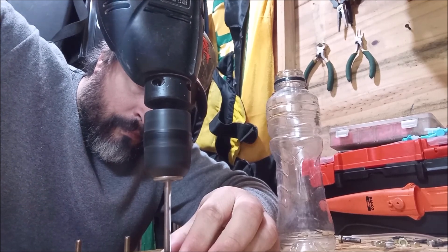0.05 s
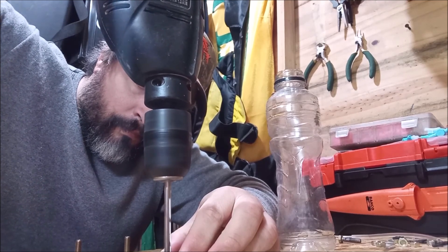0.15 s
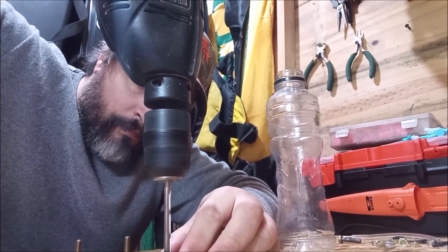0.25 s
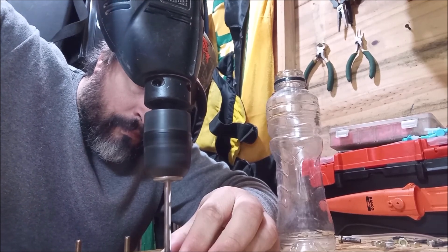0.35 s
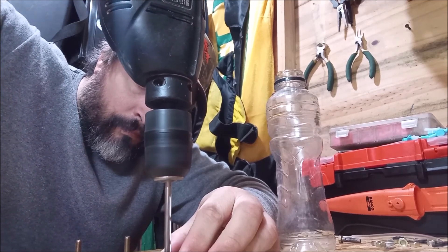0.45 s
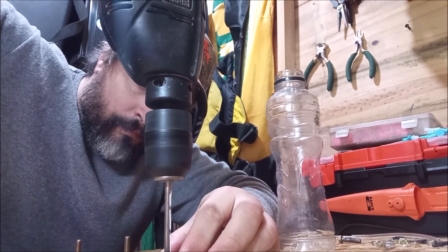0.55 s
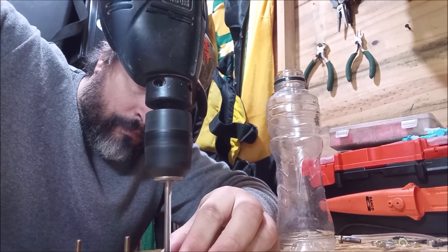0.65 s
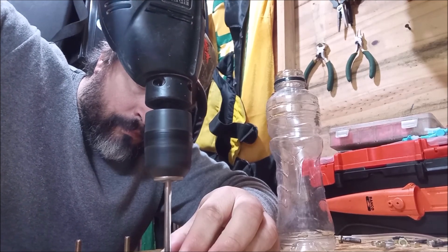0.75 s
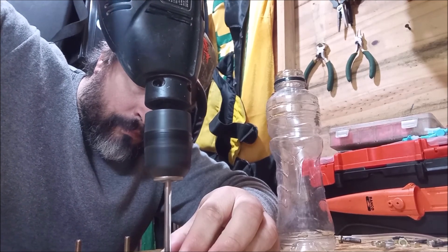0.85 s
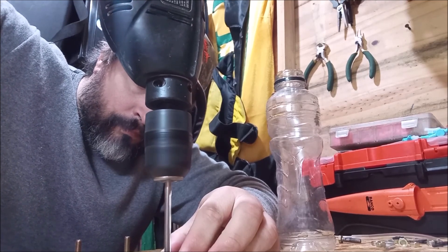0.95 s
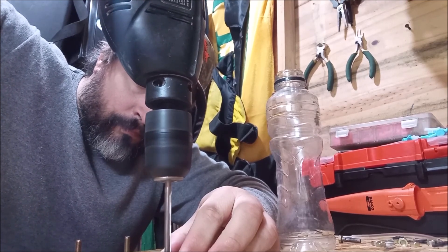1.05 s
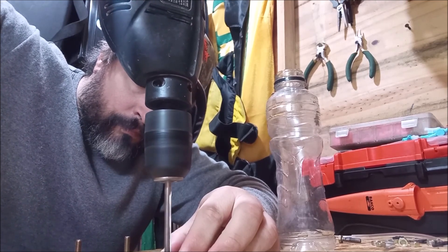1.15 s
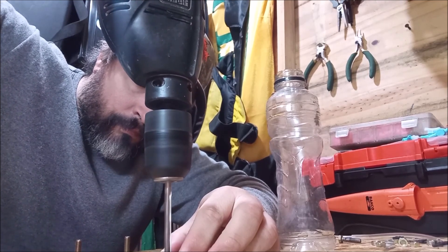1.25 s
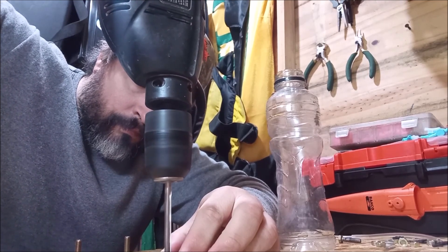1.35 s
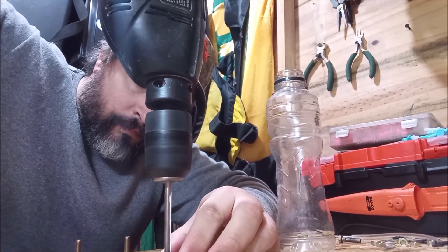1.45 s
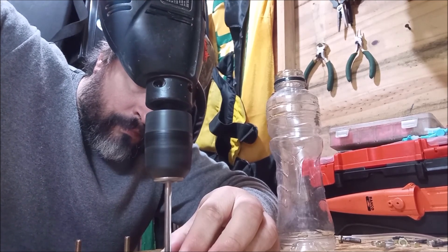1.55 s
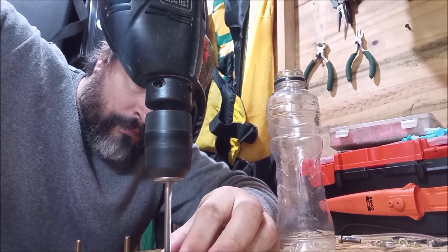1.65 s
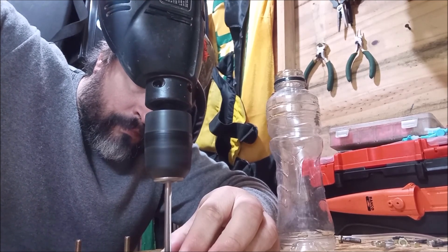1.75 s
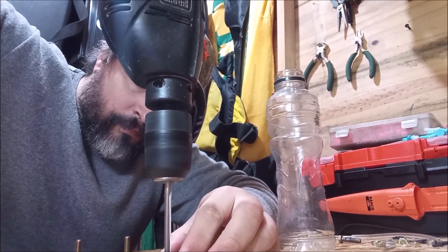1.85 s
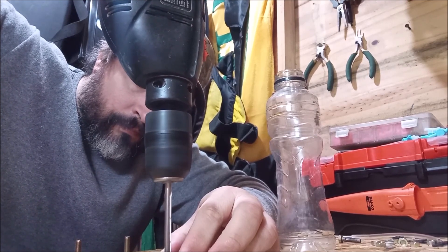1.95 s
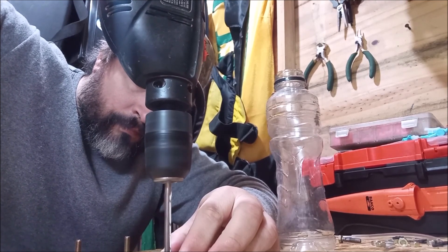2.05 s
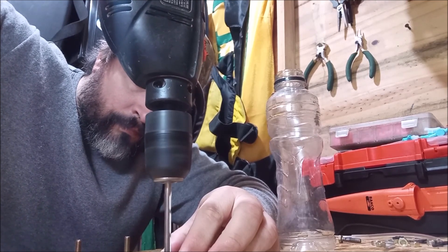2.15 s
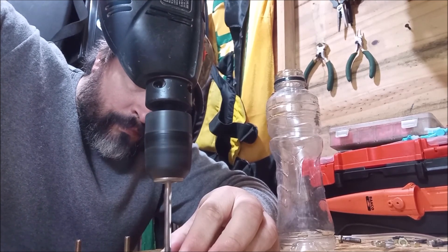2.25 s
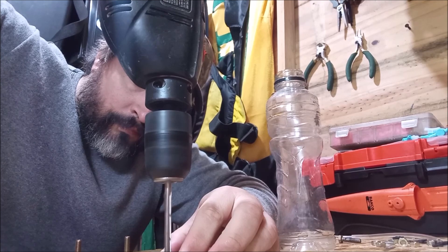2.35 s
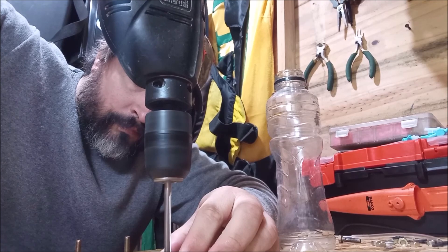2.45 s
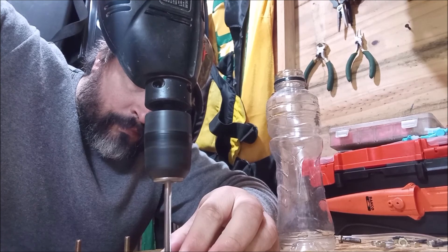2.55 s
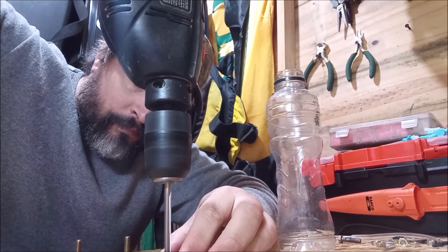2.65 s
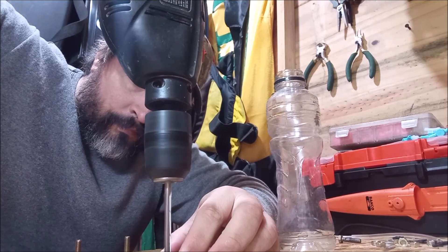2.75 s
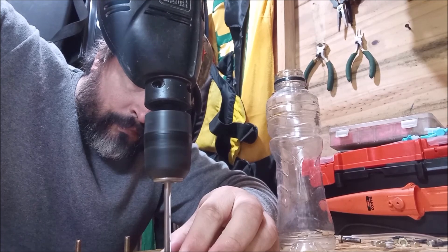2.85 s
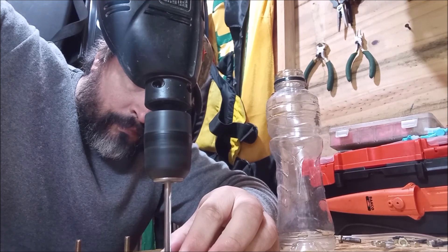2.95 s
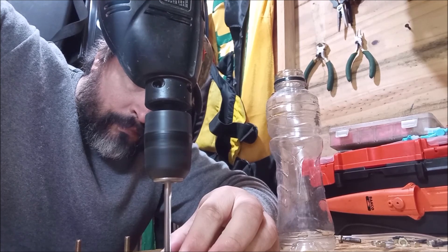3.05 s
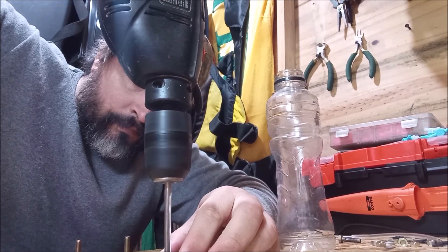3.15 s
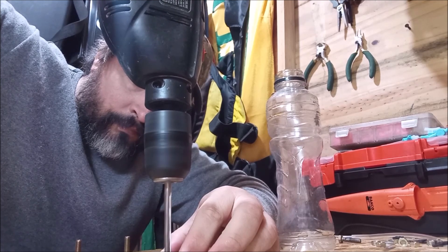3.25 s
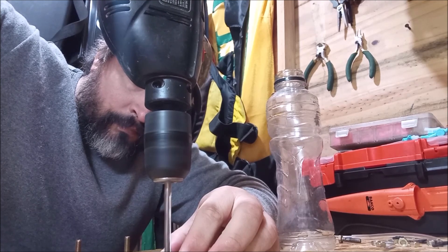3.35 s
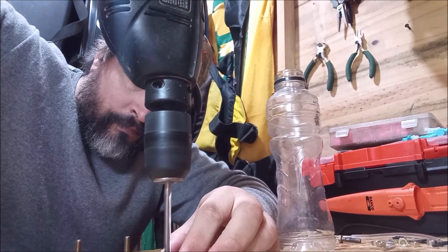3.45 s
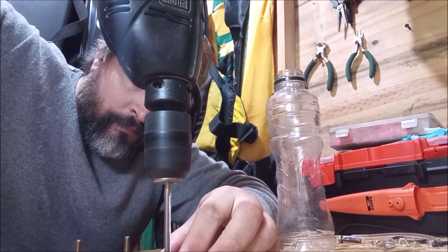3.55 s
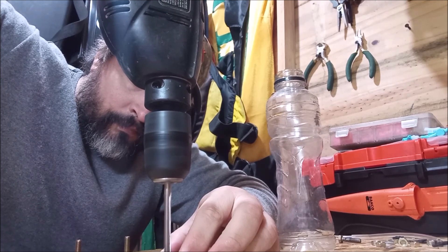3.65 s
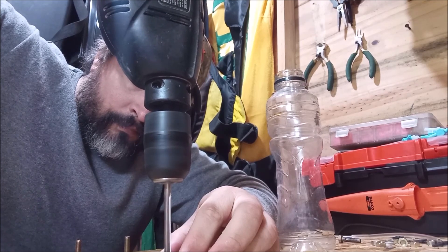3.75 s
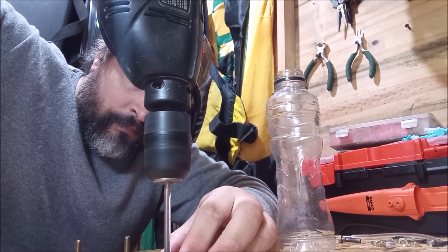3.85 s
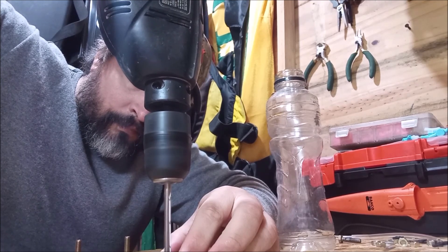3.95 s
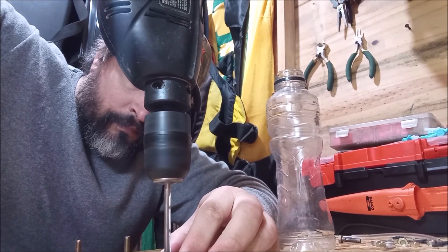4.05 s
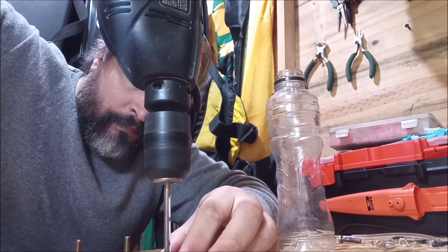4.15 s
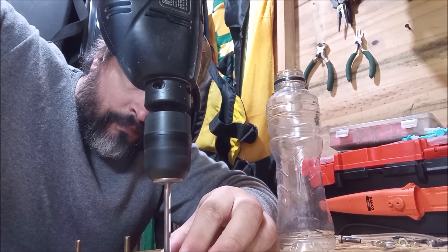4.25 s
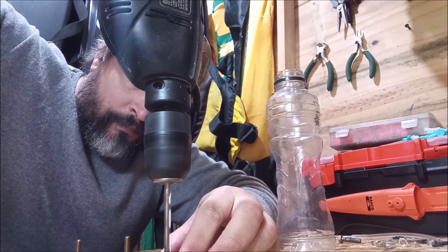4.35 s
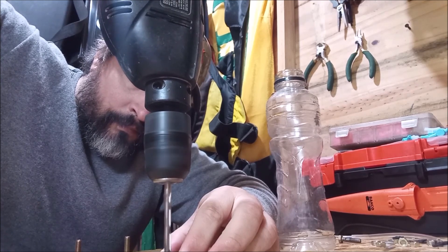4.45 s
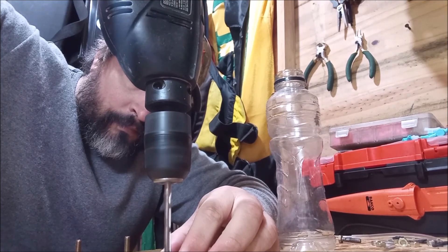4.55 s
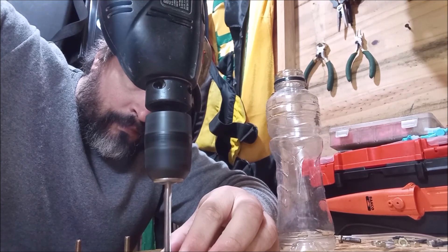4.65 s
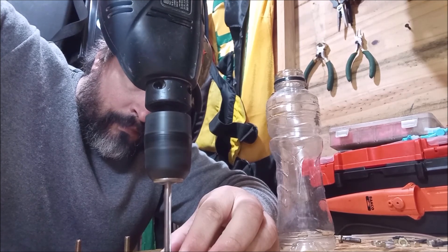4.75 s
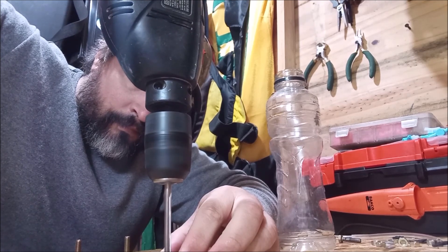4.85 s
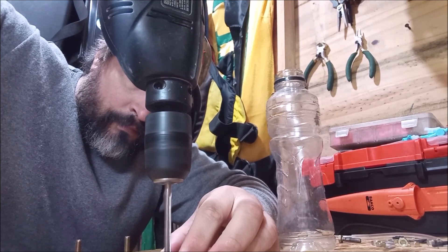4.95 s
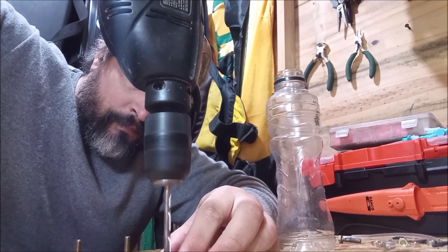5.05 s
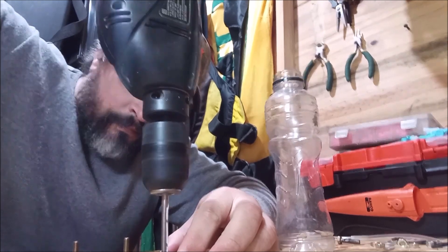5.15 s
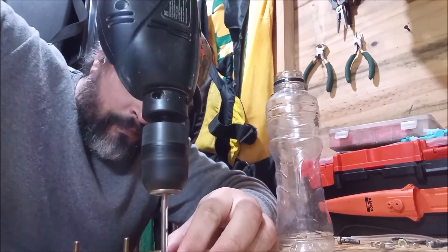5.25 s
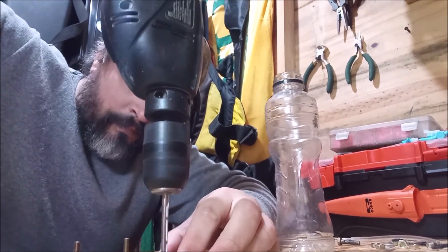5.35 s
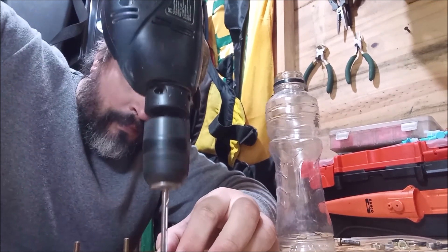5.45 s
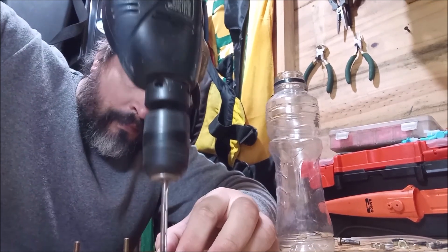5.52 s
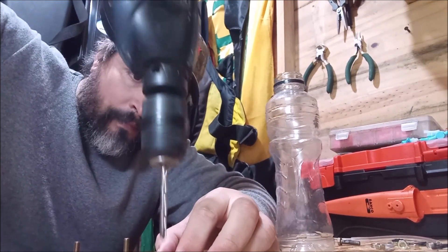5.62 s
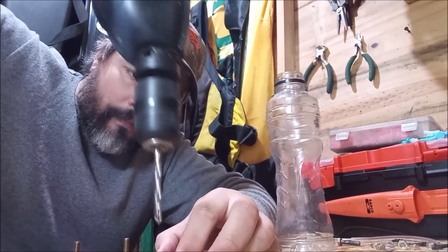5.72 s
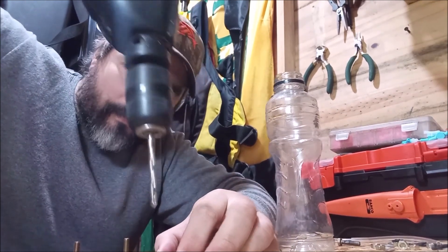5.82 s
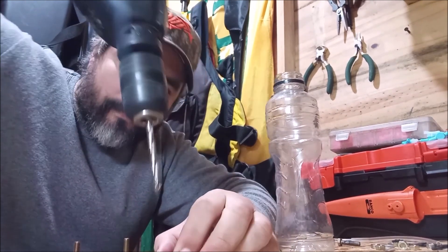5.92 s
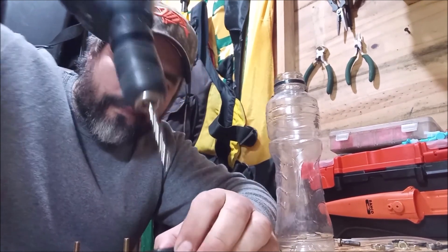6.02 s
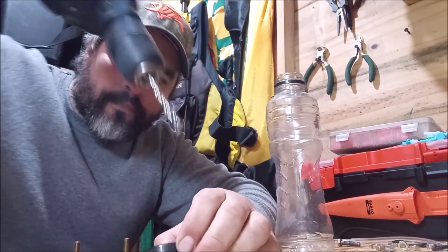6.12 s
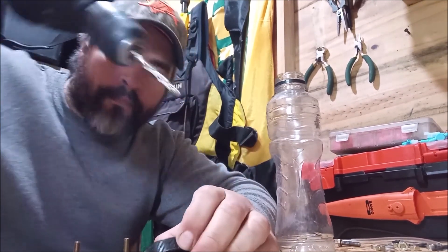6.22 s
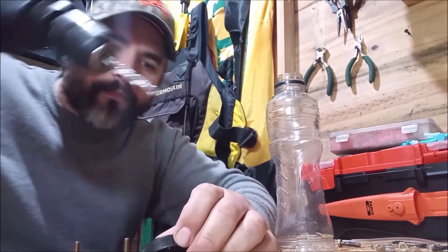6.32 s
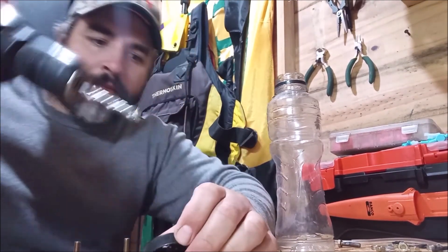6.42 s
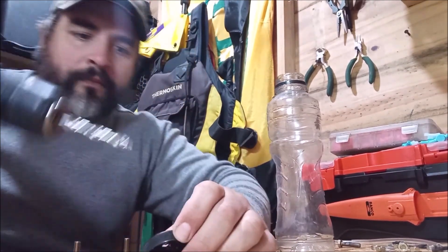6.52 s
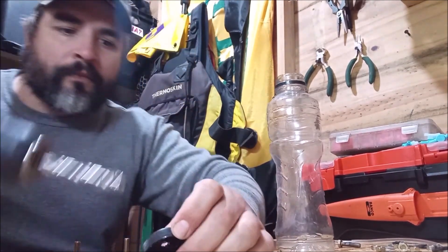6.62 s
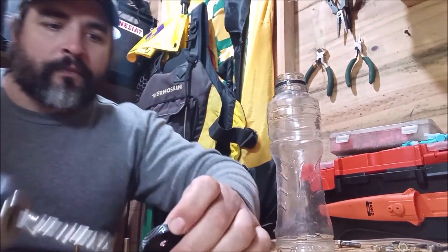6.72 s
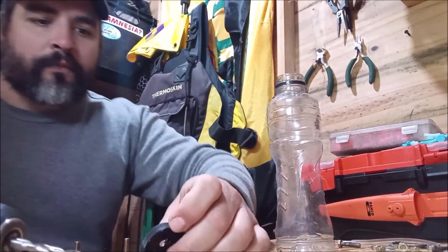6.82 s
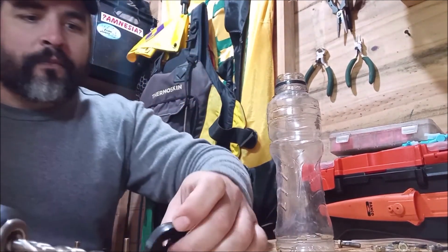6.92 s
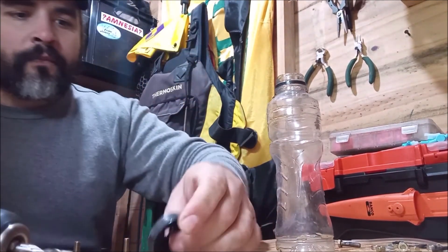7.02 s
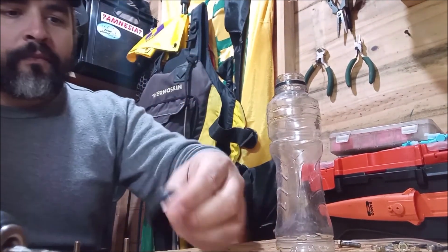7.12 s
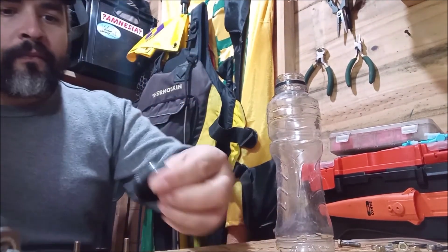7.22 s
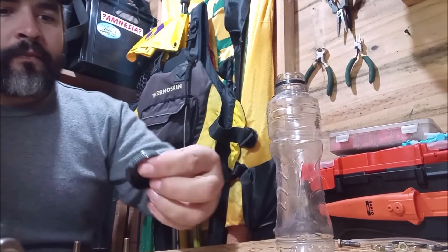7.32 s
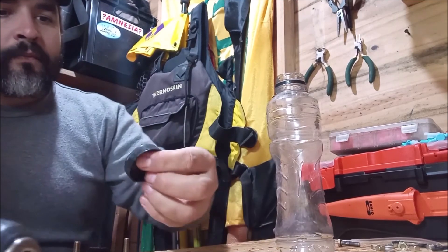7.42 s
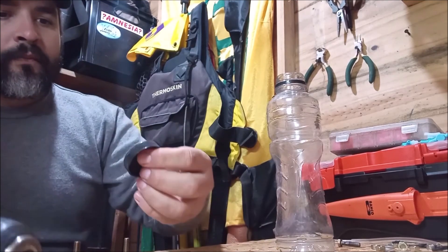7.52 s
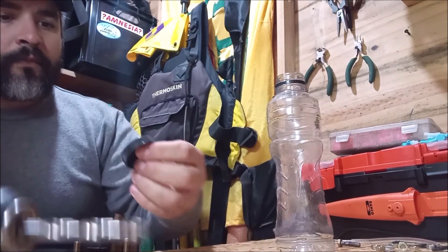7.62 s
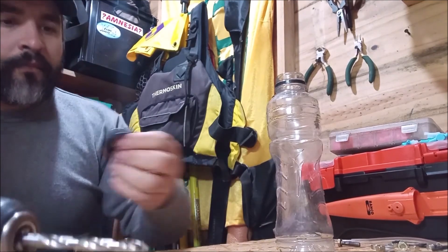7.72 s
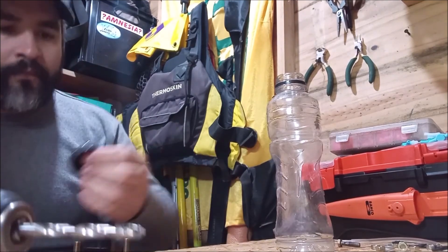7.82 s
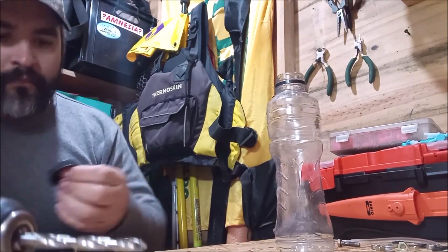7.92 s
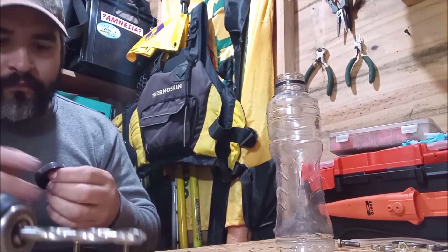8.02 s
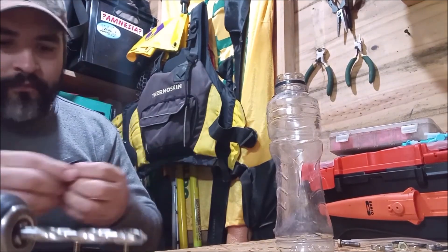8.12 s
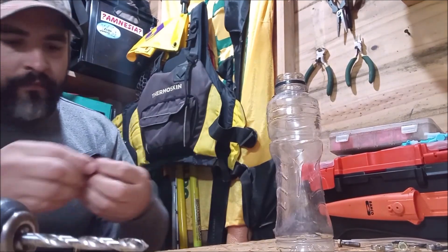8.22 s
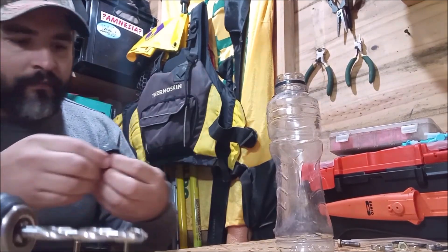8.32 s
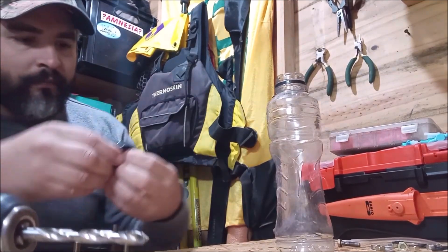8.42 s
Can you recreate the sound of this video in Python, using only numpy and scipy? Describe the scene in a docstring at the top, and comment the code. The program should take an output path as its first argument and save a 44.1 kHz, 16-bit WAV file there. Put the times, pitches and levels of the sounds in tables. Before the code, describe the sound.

An electric drill, already spinning, bores into a plastic cap, its whine rising with several trigger squeezes and sagging between them over a grinding rasp and low hum. The bit breaks through with a cluster of thumps. As the motor winds down, the cap scrapes briefly, then the drill knocks onto a wooden bench and a small steel part clinks faintly. The sound is close, in a small workshop.

```python
"""At a wooden bench in a small workshop, a corded drill bores through a plastic cap.
The motor, already spinning, speeds up with five squeezes of the trigger and coasts in between.
Brushes, gears and the bit rasp through the drill's shell, the motor whines and the bench hums.
The bit breaks through with a thump and the cap scrapes. The drill runs down and is laid on the
bench with a few knocks and a short slide, and a loose steel part bounces with a faint clink."""
import sys
import numpy as np
from scipy import signal
from scipy.fft import rfft, irfft
from scipy.io import wavfile
from scipy.ndimage import uniform_filter1d

SR = 44100
rng = np.random.default_rng(int(sys.argv[2]) if len(sys.argv) > 2 else 0)


def wrap_up_sound(samples):
    """Save the sound to the file named by the first command line argument, as 16-bit audio."""
    columns = np.atleast_2d(samples).T
    # keep every value between -1 and 1, then stretch to whole-number steps
    tamed = np.clip(columns, -1, 1)
    steps = np.round(tamed * 32767).astype(np.int16)
    wavfile.write(sys.argv[1], SR, steps)


N = 373953
TIME = np.arange(N) / SR
HZ = np.fft.rfftfreq(N, 1 / SR)
CRUISE = 150  # the motor's usual speed [turns/s]
THROUGH_S, DOWN_S = 5.13, 7.23  # the bit breaks through, the drill is down
RUMBLE_FADE_S = 8.19  # the low rumble fades away


def amp(db):
    """Turns decibels into a number to multiply a sound by."""
    return 10 ** (np.asarray(db) / 20)


def evened(x):
    """Scales a signal to an average strength (rms) of 1."""
    return x / np.sqrt(np.mean(x ** 2) + 1e-20)


def read(points, hz):
    """Looks up a table between its frequencies, spaced as the ear hears pitch."""
    f, value = np.transpose(points)
    return np.interp(np.log(hz + 1), np.log(f + 1), value)


def coloured(x, gain):
    """Turns each frequency up or down by its gain; the result has strength 1."""
    return evened(irfft(rfft(x) * gain, N))


def drift(rate, size=8192):
    """A random wander of strength 1, with up to about `rate` wiggles a second."""
    hz = np.fft.rfftfreq(size, TIME[-1] / size)
    slow = irfft(rfft(rng.standard_normal(size)) / (1 + (hz / rate) ** 4), size)
    return evened(np.interp(TIME, np.linspace(0, TIME[-1], size), slow))


def crackle(per_s, spread_db):
    """Tiny clicks at random moments, some louder than others."""
    clicks = rng.standard_normal(N) * (rng.random(N) < per_s / SR)
    return clicks * amp(spread_db * np.minimum(rng.exponential(1, N), 3))


def add(mix, s, sound):
    """Mixes a sound in, starting at s seconds."""
    part = mix[round(s * SR):][:len(sound)]
    part += sound[:len(part)]


def ring(modes, detune=0.018):
    """A struck object's tones, a little different each time; each fades 60 dB in its fade time, t60."""
    t = TIME[:SR // 2]
    x = np.zeros(len(t))
    for hz, db, t60 in modes:
        pitch = hz * (1 + detune * rng.uniform(-0.96, 1))
        onset = 1 - np.exp(-(3 * hz * t) ** 2)
        x += amp(db - 60 * t / t60) * np.sin(2 * np.pi * (pitch * t + rng.random())) * onset
    return x / np.std(x[:SR // 50])


def burst(spectrum, t60, rise_s=0.0012):
    """A fading puff of noise that starts at strength 1."""
    size = SR // 2
    gain = amp(read(spectrum, np.fft.rfftfreq(size, 1 / SR)))
    x = irfft(rfft(rng.standard_normal(size)) * gain, size)
    x *= amp(-60 * TIME[:size] / t60) * (1 - np.exp(-TIME[:size] / rise_s))
    return x / np.std(x[:SR // 50])


def rub(stroke, spectrum, level_db, stutter_db):
    """The noise of one surface catching and slipping on another."""
    start, rise, hold, fade = stroke
    envelope = np.interp(TIME, start + np.cumsum([0, rise, hold, fade]), [0, 1, 1, 0])
    noise = coloured(rng.standard_normal(N), amp(read(spectrum, HZ)))
    return envelope * amp(level_db + stutter_db * drift(60)) * noise


def coast(speed, seconds, friction=41.5, drag=.289):
    """Speed left after spinning freely: friction takes a steady amount, drag takes a share."""
    return np.maximum((speed + friction / drag) * np.exp(-drag * seconds) - friction / drag, 1)


# trigger squeezes: (start [s], release [s], top speed [turns/s], ease [1 abrupt to 2 gentle],
# friction afterwards [turns/s lost each s])
TRIGGER = [(.345, .715, 130.6, 1, 42), (.715, .905, 264.4, 1, 44.8), (2.34, 2.585, 171, 2, 40.5),
           (2.965, 3.38, 207.4, 1.55, 45.8), (4.6, 4.84, 185.4, 1, 50)]
def motor_speed(first_speed=147.1, snag_loss=5.9, snag_s=.07):
    """Turns per second: each squeeze speeds the motor up, then it coasts; breaking through snags it."""
    speed = coast(first_speed, TIME)
    for start, release, top, ease, friction in TRIGGER:
        low = np.interp(start, TIME, speed)
        progress = np.clip((TIME - start) / (release - start), 0, 1)
        rising = low + (top - low) * np.sin(np.pi / 2 * progress) ** ease
        falling = coast(top, TIME - release, friction)
        speed = np.select([TIME < start, TIME < release], [speed, rising], falling)
    since = np.maximum(TIME - THROUGH_S, 0)
    snagged = np.interp(THROUGH_S, TIME, speed) - snag_loss * (1 - np.exp(-since / snag_s))
    return np.where(TIME < THROUGH_S, speed, coast(snagged, since))


def current(full_acceleration=1000):
    """Electric current, 0 to 1: the motor draws more the faster it gains speed."""
    acceleration = np.gradient(motor_speed(), TIME)
    return uniform_filter1d(np.clip(acceleration / full_acceleration, 0, 1), size=1500)


def through(clear_s=0.03):
    """0 while the bit is in the cap, 1 once it is clear."""
    return np.clip((TIME - THROUGH_S) / clear_s, 0, 1)


# the hand bearing down and easing off: (time [s], bite strength [dB])
HAND_PRESSURE = [(0, -37), (.64, -42.5), (.76, -50.5), (.87, -32.5), (1.25, -34.5), (1.7, -37), (2.3, -39),
                 (2.55, -37), (3.0, -37.5), (3.2, -35.5), (3.6, -35), (4.25, -39), (4.6, -42),
                 (4.78, -37.5), (5.13, -36)]
def bite(hard_bite_db=-33):
    """How hard the bit cuts, in dB; 0 is a hard bite."""
    return np.interp(TIME, *np.transpose(HAND_PRESSURE)) - hard_bite_db


# the overall tone of the drill's shell: (frequency [Hz], level [dB])
SHELL_TONE = [(40, -21), (110, 1), (280.0, -0.5), (400.0, 0.5), (900.0, 0), (1800.0, 3.5), (2800.0, -12),
              (4800.0, -5), (7000.0, -8.5), (7600.0, -15.5), (8100.0, -34), (8500.0, -36)]
# pitches at which the shell rings: (frequency [Hz], width [Hz], boost [dB])
SHELL_PEAKS = [(325, 90, -4), (485, 80, 8.5), (640, 68, 14.5), (761, 45, 6.5), (907, 150, 9),
               (1002, 74, 4.5), (1165, 130, 11), (1452, 124, 9), (1633, 92, 3), (1830, 200, -3),
               (2325, 260, 14.5), (2505, 130, 8.5), (2855, 170, 12.5), (3070, 230, 9.5), (3235, 105, 6.5),
               (3590, 230, 9), (3836, 135, 11), (4060, 180, -2.5), (4534, 300, 4.2), (5700, 120, 2.4),
               (6653, 160, 2.5)]
def shell_gain():
    """How well the drill's shell passes each frequency, at most 1."""
    peaks = sum(boost / (1 + (2 * (HZ - f) / width) ** 2) for f, width, boost in SHELL_PEAKS)
    db = read(SHELL_TONE, HZ) + peaks
    return amp(db - db.max())


def wear(speed, turns, size=512, fewest_bumps=10):
    """Worn parts meet the same tiny bumps on every turn, which makes a buzz."""
    fine = np.arange(size // 2 + 1) >= fewest_bumps
    bumps = irfft(rfft(rng.standard_normal(size)) * fine, size)
    return np.interp(turns * size, np.arange(size), bumps, period=size) * np.sqrt(speed * size / SR)


# low grinding, middle rattle and high brush hiss: (level at CRUISE [dB], rise per doubled speed [dB],
# speed where the rise ends [turns/s], change at full current [dB], change once through [dB])
RASP_LAYERS = [(-39, 12.5, 174, 1.5, -1.5), (-36.5, 9, 158.4, 4, -3), (-42.5, 10, 179, -1, -1)]
# brush hiss leaving through the air vents: (frequency [Hz], level [dB])
ESCAPING_HISS = [(600, -1), (1300, 0), (1900, 0), (3000, 7), (4500, 4), (7300, -15), (8300, -23)]
def rasp(speed, turns, shell, bars=24, vent_db=-52, stop_db_per_s=45):
    """Brushes, teeth and bit make tiny hits, bunched as the motor's contact bars pass the brushes."""
    pull, clear = current(), through()
    repeating = np.interp(clear, [0, 1], [.3, .45])  # share of hits that return every turn
    hits = np.sqrt(1 - repeating) * evened(crackle(SR / 2, spread_db=1))
    hits += np.sqrt(repeating) * wear(speed, turns)
    hits *= (1 + 0.38 * np.cos(2 * np.pi * bars * turns)) * (1 + 0.015 * np.cos(2 * np.pi * turns))
    hits *= amp(1.1 * drift(42) + 0.32 * drift(6.8))  # quick flutter, slow swell
    hiss = coloured(hits, np.sqrt(shell) * amp(read(ESCAPING_HISS, HZ)))
    out = amp(vent_db + 4 * np.log2(speed / CRUISE)) * hiss
    below_rattle, below_hiss = 1 / (1 + (HZ / 1950) ** 16), 1 / (1 + (HZ / 4250) ** 24)
    bands = below_rattle, below_hiss - below_rattle, 1 - below_hiss
    for (db, rise, full, pull_db, clear_db), band in zip(RASP_LAYERS, bands):
        db += rise * np.log2(np.minimum(speed, full) / CRUISE) + pull_db * pull + clear_db * clear
        out += amp(db) * coloured(hits, shell * band)
    return out * amp(-stop_db_per_s * np.maximum(TIME - DOWN_S, 0))


# the cap under the bit's edges: (frequency [Hz], level [dB])
CAP_GRIND = [(400, -9), (650, -3), (950, 2), (1350, -4.5), (2200, -11.5), (5000, -32.5)]
# the bit's grooves scraping the rim of the hole: (frequency [Hz], level [dB])
RIM_SCRAPE = [(1200, -24), (2400, -1.5), (3200, -2), (4600, 3), (6500, 2), (8400, -19.5)]
def cutting(turns, shell, grind_db=-34, scrape_db=-39, contrast=1.94, gear_ratio=14, chips_per_s=3500):
    """The bit's two edges tear chips from the cap and scrape the hole, pulsing as they turn."""
    pulses = 1 + 0.42 * np.cos(2 * np.pi * 2 * turns / gear_ratio + drift(2.6))
    level = amp(contrast * bite()) * (1 - through())
    grind = coloured(crackle(chips_per_s, spread_db=2) * pulses, shell * amp(read(CAP_GRIND, HZ)))
    scrape = coloured(crackle(chips_per_s, spread_db=2) * pulses, amp(read(RIM_SCRAPE, HZ)))
    return level * (amp(grind_db) * grind + amp(scrape_db) * scrape)


# tones of fan blades, contact bars and gear teeth: (pitch [times motor speed], level [dB])
MOTOR_TONES = [(18, -36), (22, -46), (23, -45), (24, -36), (25, -44), (28, -46), (29, -40), (37, -43),
               (42, -48), (47, -43), (48, -36), (49, -44), (72, -48), (73, -48), (96, -45), (97, -47),
               (120, -43)]
# gears that sing only while the bit cuts: (pitch [times motor speed], level [dB])
GEAR_TONES = [(4, -48), (8, -43), (12, -48), (14, -52), (20, -43)]
# how well the vents let the whine out: (frequency [Hz], level [dB])
VENT_TONE = [(500, -18), (1700, -13), (2200, -2), (2800, -1), (3400, -2), (3780, 2), (4150, 0), (4600, -2),
             (6000, -2), (6700, 5), (7600, 1)]
def whine(speed, turns, shell, boost_db=4.5, surge_db=-28.5, full_speed=140):
    """Spinning parts sing tones that follow the motor's speed, and blur and weaken in a hard bite."""
    tones = np.zeros(N)
    outlet = shell ** .78 * amp(read(VENT_TONE, HZ))
    loaded = 1 - through()
    pressure = loaded * amp(bite()) ** 2
    jitter = .2 + .6 * pressure  # the bite shakes the gears [radians]
    for table, engaged in (MOTOR_TONES, 1), (GEAR_TONES, loaded):
        for multiple, db in table:
            tone = np.cos(2 * np.pi * multiple * turns + jitter * drift(70)) * (1 + .3 * drift(30))
            level = engaged * amp(db + boost_db + 2 * drift(5))
            tones += level * np.interp(multiple * speed, HZ, outlet) * tone
    tones *= amp(-4 * pressure - 3 * through()) * np.minimum(speed / full_speed, 1) ** 1.5
    # heavy current while speeding up makes the motor's twelve slots sing
    slots = np.sqrt(np.interp(12 * speed, HZ, outlet)) * np.cos(2 * np.pi * 12 * turns)
    return np.sqrt(2) * (tones + amp(surge_db) * current() ** 2 * slots)


def hum(speed, turns, hum_db=-51.5, peak_hz=142, width_hz=22, boost_db=8, seated_s=1.0):
    """The off-balance motor shakes the bench through the bit, most of all near peak_hz."""
    # grows as the bit settles in, fades once through, and is held down by a hard bite
    contact_db = -7 * np.maximum(1 - TIME / seated_s, 0)
    contact_db -= 18 * np.maximum(TIME - THROUGH_S, 0) + 0.22 * bite()
    peak_db = boost_db / (1 + (2 * (speed - peak_hz) / width_hz) ** 2)
    level = amp(hum_db + contact_db + peak_db) * np.minimum(speed / peak_hz, 1) ** 2
    chatter = (.25 + .6 * amp(bite()) ** 2) * drift(25)
    return np.sqrt(2) * level * np.sin(2 * np.pi * turns + chatter) * (1 + .3 * drift(18))


# how long the workshop echoes: (frequency [Hz], fade time [s])
ECHO_TIMES = [(100, 0.75), (250, 0.35), (800, 0.19), (3000, 0.2), (8000, 0.057)]
def room(x):
    """Scattered echoes of a small, cluttered workshop; the low notes last longest."""
    echoes = rng.choice([-1., 1.], SR) * (rng.random(SR) < 2000 / SR) * (TIME[:SR] > .004)
    hz, t, bands = signal.stft(echoes, SR, nperseg=256)
    tail = signal.istft(bands * amp(-60 * t / read(ECHO_TIMES, hz)[:, None]), SR, nperseg=256)[1]
    return signal.fftconvolve(x, tail / np.linalg.norm(tail))[:N]


def drill(wobble=0.001016, room_db=-14):
    """One motor drives rasp, cutting, whine and hum; the room echoes the rougher sounds."""
    speed = motor_speed() * (1 + wobble * drift(31.6))
    turns, shell = np.cumsum(speed) / SR, shell_gain()
    rough = rasp(speed, turns, shell) + cutting(turns, shell)
    return rough + amp(room_db) * room(rough) + whine(speed, turns, shell) + hum(speed, turns)


# the bench's low rumble: (frequency [Hz], level [dB])
RUMBLE_TONE = [(20, -42.5), (45, -19), (70, -18), (130, 3), (205, -4.5), (280, -25), (600, -46),
               (1500, -61.5), (8000, -73)]
# hands leaning on the bench and shifting the cap: (time [s], level [dB])
HAND_NUDGES = [(5.47, -46.5), (5.72, -55), (5.92, -50), (6.28, -55.5), (6.65, -51.5)]
def bench_rumble(boring_db=-54, shudder_db=-33, resting_db=-64, nudge_s=0.17):
    """The bench is shaken by the boring bit, by the cap snagging as the bit comes out, and by hands."""
    boring = amp(boring_db) * (1 - through()) * motor_speed() / CRUISE
    shudder = through() * amp(shudder_db - 60 * np.maximum(TIME - THROUGH_S, 0))
    resting = amp(resting_db - 55 * np.maximum(TIME - RUMBLE_FADE_S, 0))
    nudges = sum(amp(db) * np.exp(-((TIME - s) / nudge_s) ** 2) for s, db in HAND_NUDGES)
    rumble = coloured(rng.standard_normal(N), amp(read(RUMBLE_TONE, HZ)))
    return np.sqrt(boring ** 2 + shudder ** 2 + resting ** 2 + nudges ** 2) * rumble


def still_air(level_db=-88):
    """The faint, steady hush of the workshop's air."""
    spectrum = [(100, -7.5), (700, -12.5), (2000, -18.5), (8000, -28.5)]
    return amp(level_db) * coloured(rng.standard_normal(N), amp(read(spectrum, HZ)))


# brief dropouts: (time [s], half-width [s], depth [dB])
LEVEL_DIPS = [(.737, .012, -7), (1.264, .011, -14), (1.86, .012, -5), (2.145, .012, -6), (2.55, .012, -7),
              (2.95, .012, -6), (3.866, .012, -17), (4.88, .012, -7), (5.176, .012, -20), (6.74, .012, -6)]
def dipped(x, held_db=3):
    """The sound drops out briefly now and then, leaving a few held tones."""
    gain = amp(sum(db * np.exp(-((TIME - s) / width) ** 2) for s, width, db in LEVEL_DIPS))
    held_tones = amp(held_db) * irfft(rfft(x) * shell_gain() ** 0.91, N)
    return gain * x + (1 - gain) * held_tones


# low tones of the whole bench top: (frequency [Hz], level [dB], fade time [s])
TOP_TONES = [(67.5, 2.5, 0.063), (115, 1.5, 0.07), (151.5, -2, 0.14), (217, -6.5, 0.11)]
# higher tones of its boards: (frequency [Hz], level [dB], fade time [s])
BOARD_TONES = [(403, -1.5, 0.067), (444, -5.5, 0.042), (486, 2, 0.075), (636, -10.5, 0.17),
               (724, -6.5, 0.063), (790, -18, 0.32), (892, -16, 0.13)]
def bench_blow(thud_db, wood_db):
    """One blow on the bench: the top thuds and the boards knock with a puff of woody noise."""
    top, boards = ring(TOP_TONES, detune=.03), ring(BOARD_TONES, detune=.03)
    grain = burst([(120, -6), (300, 7), (600, -12), (1000, -2), (1800, -24), (8000, -45)], t60=0.13)
    return amp(thud_db + 1) * top + amp(wood_db - 6.5) * (boards + amp(-8.5) * grain)


# jolts from the bit: (time [s], thud [dB], wooden knock [dB])
BIT_JOLTS = [(5.143, -32.5, -46), (5.163, -24.5, -26.5), (5.183, -30.5, -25), (5.213, -40, -29),
             (5.276, -35, -30), (5.295, -30, -41), (5.377, -45, -33.5), (5.572, -42, -31)]
def breakthrough(boost_db=0.5):
    """The bit breaks through the cap and jolts the bench."""
    out = np.zeros(N)
    for s, thud, wood in BIT_JOLTS:
        add(out, s, amp(boost_db) * bench_blow(thud, wood))
    return out


# the cap's move: (start [s], rise [s], hold [s], fade [s])
CAP_MOVE = (6.39, .08, .04, .1)
def cap_scrape():
    """The plastic cap scrapes across the bench."""
    spectrum = [(700, -18), (1050, 6), (1550, 11), (2100, -35)]
    return rub(CAP_MOVE, spectrum, level_db=-45, stutter_db=2.5)


# the drill landing and rocking: (time [s], thud [dB], wooden knock [dB], plastic clack [dB])
LANDINGS = [(7.084, -36.5, -37.5, -70), (7.098, -37.5, -44, -82), (7.2872, -33, -33.5, -44),
            (7.311, -40.5, -39, -50.5), (7.3809, -33, -25, -56.5), (7.392, -31, -38.5, -51.5),
            (7.688, -47, -50, -72), (7.709, -38, -38, -49), (7.723, -38, -37.5, -58),
            (7.746, -38.5, -38.5, -62), (7.757, -42, -38, -56.5), (7.835, -31.5, -39, -48),
            (7.85, -41, -45, -57)]
# the noise of a plastic clack: (frequency [Hz], level [dB])
CLACK_TONE = [(700, -23.5), (1300, 7), (2200, 10), (3200, 2.5), (3800, -6), (6800, -20), (8200, -49)]
# tones of the struck shell: (frequency [Hz], level [dB], fade time [s])
SHELL_RING = [(1410, 0, 0.042), (1720, -2.5, .04), (2380, -5, 0.034), (2380, -10, 0.06),
              (2880, -9.5, 0.038), (3340, -4.5, 0.062)]
def set_down(push_db=9, push_s=.0008):
    """Each time the drill touches the bench, it gives the boards a hard push and its shell clacks."""
    out = np.zeros(N)
    u = TIME[:SR // 2] / push_s - 2
    push = u * np.exp(-u ** 2) * np.sqrt(2 * np.e)  # one swing down and back, peak 1
    for s, thud, wood, clack in LANDINGS:
        plastic = amp(2) * burst(CLACK_TONE, t60=0.039, rise_s=0.00063) + amp(-4) * ring(SHELL_RING)
        add(out, s, bench_blow(thud, wood) + amp(wood + push_db) * push + amp(clack) * plastic)
    return out


# small plastic ticks: (time [s], level [dB])
TICK_TIMES = [(7.175, -54.5), (8.141, -79)]
def plastic_ticks():
    """Plastic ticks lightly, each tick a short puff of noise."""
    out = np.zeros(N)
    spectrum = [(500, 8), (1500, 1), (4000, 5), (6500, 1.5), (8200, -26)]
    for s, db in TICK_TIMES:
        add(out, s, amp(db) * burst(spectrum, t60=0.11))
    return out


# the chuck hitting the bench: (time [s], level [dB])
CHUCK_HITS = [(7.383, -58), (7.765, -57.5), (7.849, -58)]
# the noise of one hit: (frequency [Hz], level [dB])
SNAP_TONE = [(2500, -22), (4200, 8.5), (5500, 3), (7200, -2.5), (8200, -33.5)]
def chuck_snaps():
    """The chuck, the clamp that holds the bit, snaps sharply against the bench."""
    out = np.zeros(N)
    for s, db in CHUCK_HITS:
        add(out, s, amp(db) * burst(SNAP_TONE, t60=0.054, rise_s=.0003))
    return out


# the drill's move: (start [s], rise [s], hold [s], fade [s])
DRILL_MOVE = (7.39, .01, .11, .05)
def drill_slide():
    """The drill rubs a short way along the wood."""
    spectrum = [(200, -18), (550, 18.5), (780, 9), (1100, -1), (2500, -6.5), (7000, -30.5)]
    return rub(DRILL_MOVE, spectrum, level_db=-49, stutter_db=0.5)


# a loose steel part bouncing: (time [s], level [dB])
BOUNCES = [(7.585, -56.5), (7.753, -49), (7.8975, -57), (7.978, -65), (8.041, -73)]
# its ringing tones: (frequency [Hz], level [dB], fade time [s])
STEEL_TONES = [(1670, -3.5, 0.35), (1660, -3, 0.16), (2360, -17, 0.28), (3488, -19, .1), (3720, 1, 0.1),
               (3970, -3, 0.088), (4270, -3, 0.092), (4860, -13, 0.11), (5400, -12, 0.087),
               (6200, -18, .14)]
# its rattle: (frequency [Hz], level [dB])
STEEL_RATTLE = [(1000, -3), (3200, -19), (3850, -3), (4300, -6), (4800, -28), (6000, -18), (6800, -39)]
def steel_clinks(ring_db=-6.5):
    """A loose steel part rings and rattles at each bounce."""
    out = np.zeros(N)
    for s, db in BOUNCES:
        clink = amp(ring_db) * ring(STEEL_TONES, detune=0.0022) + 0.19 * burst(STEEL_RATTLE, t60=0.34)
        add(out, s, amp(db) * clink)
    return out


def scene(room_db=-15):
    """Drill and bench close by, with the workshop echoing softly."""
    contacts = breakthrough() + cap_scrape() + set_down() + plastic_ticks()
    contacts += chuck_snaps() + drill_slide() + steel_clinks()
    echo = amp(room_db) * room(contacts)
    return (dipped(drill()) + contacts + echo + bench_rumble() + still_air())[None]


def record(dry, low_hz=46, high_hz=8300):
    """The microphone loses the deepest bass, and the recorder cuts the highest treble."""
    lean = signal.sosfilt(signal.butter(3, low_hz, "high", fs=SR, output="sos"), dry)
    treble_cut = signal.firwin(301, high_hz, window=("kaiser", 9), fs=SR)
    return signal.oaconvolve(lean, treble_cut[None], "same")


dry = scene()
out = record(dry)
wrap_up_sound(out)
```